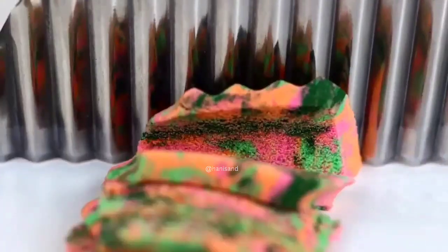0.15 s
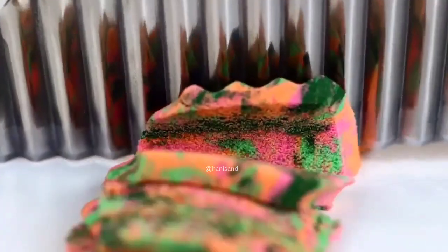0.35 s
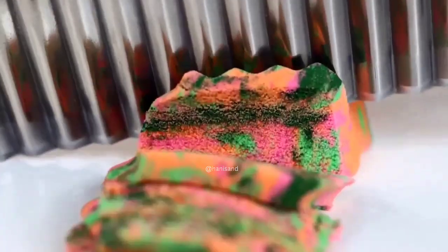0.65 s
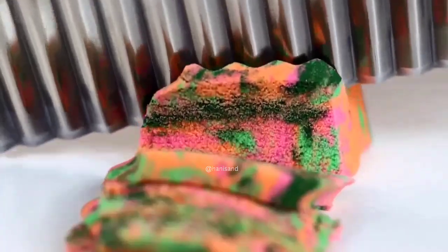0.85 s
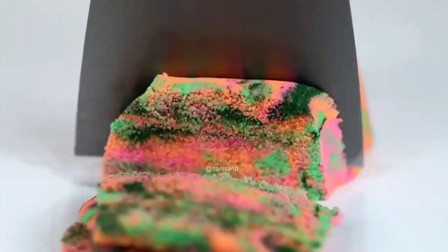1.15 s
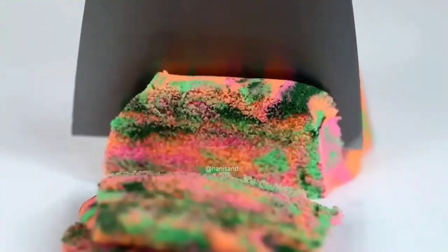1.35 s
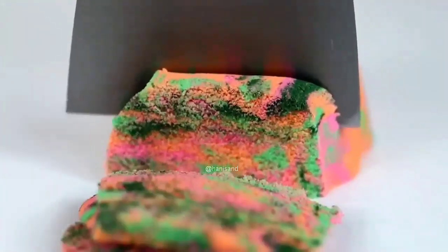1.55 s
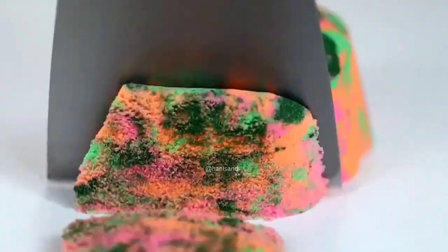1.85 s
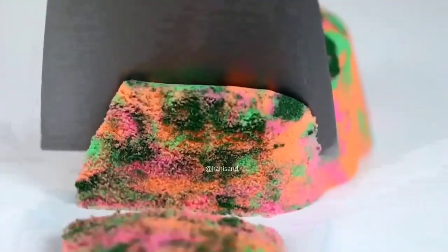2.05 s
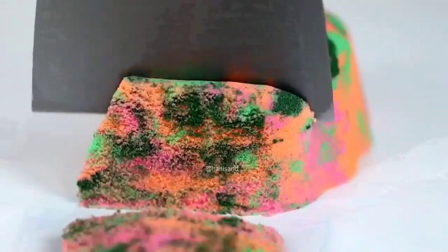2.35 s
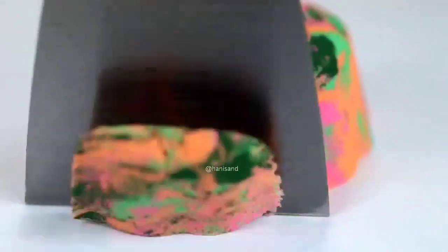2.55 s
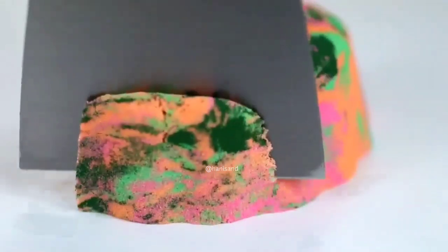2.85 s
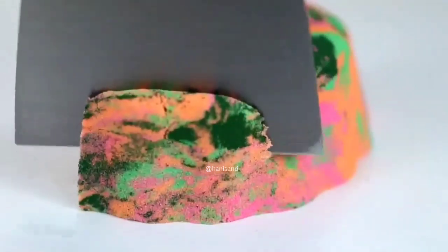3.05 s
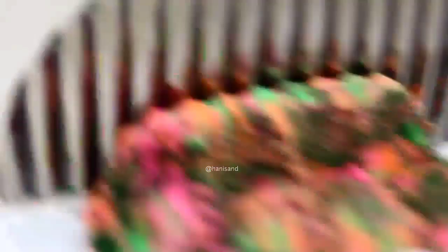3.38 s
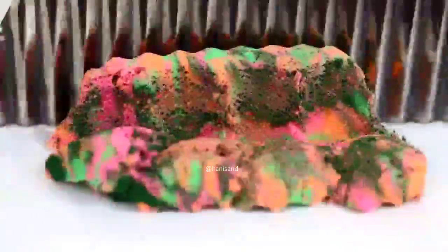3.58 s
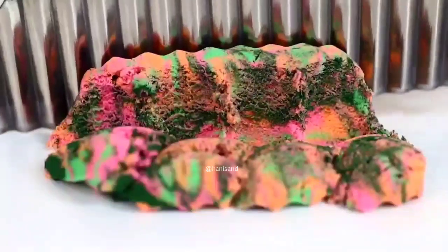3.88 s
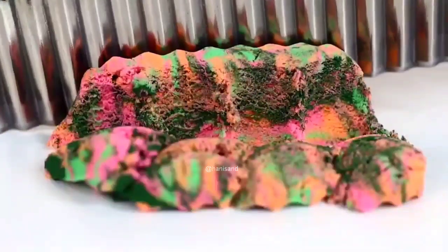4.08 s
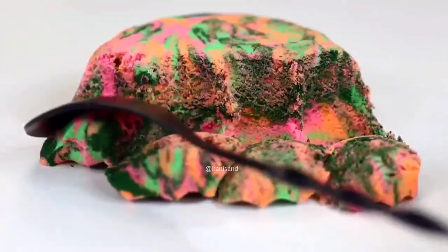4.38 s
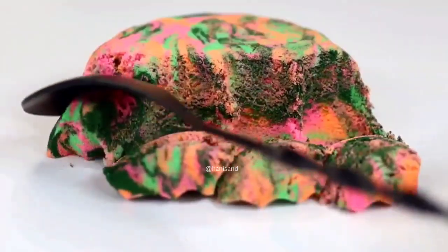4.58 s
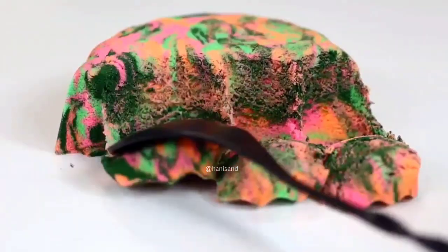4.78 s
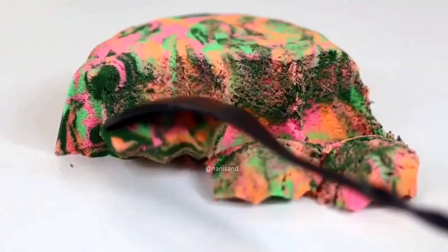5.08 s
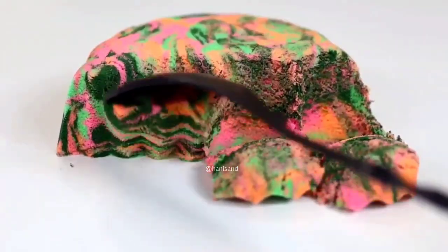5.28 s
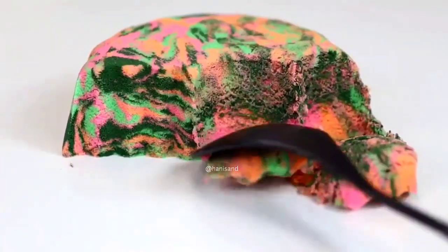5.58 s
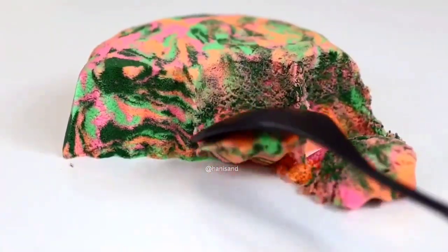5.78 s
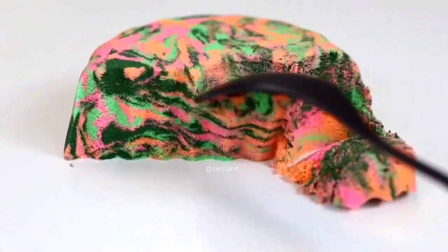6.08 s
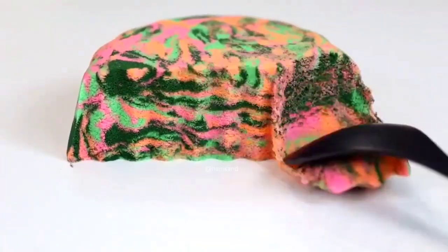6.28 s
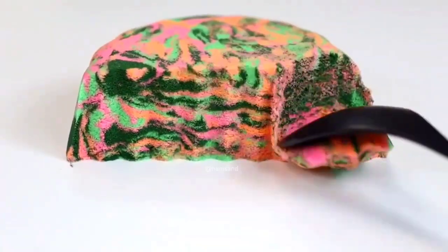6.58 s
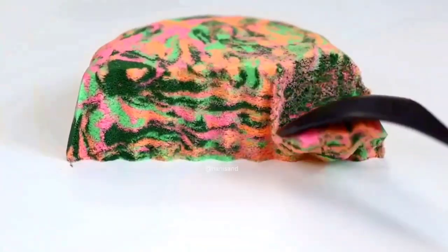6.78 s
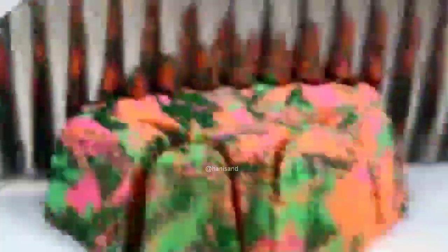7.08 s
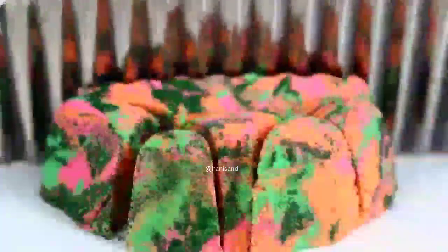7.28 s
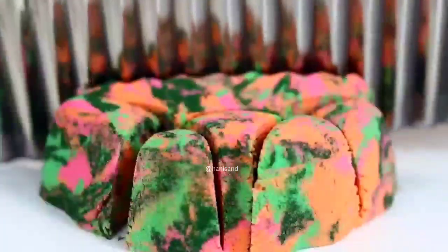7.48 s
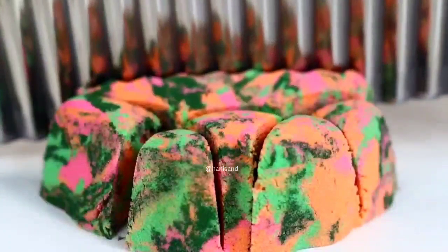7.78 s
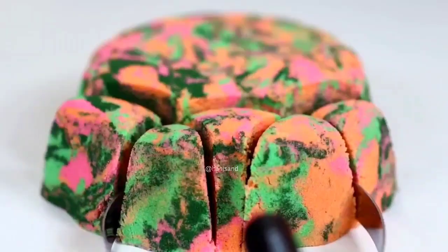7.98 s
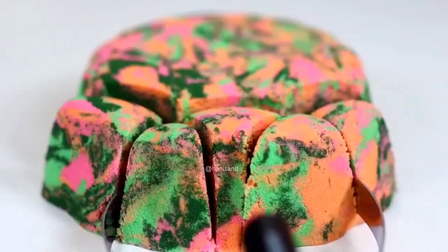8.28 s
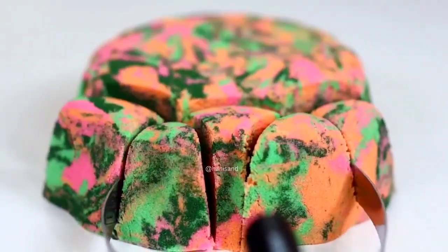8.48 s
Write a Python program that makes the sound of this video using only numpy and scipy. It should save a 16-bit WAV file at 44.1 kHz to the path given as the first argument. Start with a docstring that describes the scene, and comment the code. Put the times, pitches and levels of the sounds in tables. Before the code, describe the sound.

Very close stereo of packed damp sand being cut, played backwards. A wavy blade snaps and rasps, then a flat knife crunches in short strokes. A deep plunge crackles loudly, spoon scoops click and hiss more softly, another heavy plunge crunches, and a small ring scoop ends it. Snaps swell and cut off dead; a faint low rumble lies underneath in a quiet room.

```python
"""Packed damp sand is cut and scooped close to two microphones in a quiet, low-rumbling room, running backwards.
A wavy blade opens at the left, then a flat knife; at the right a blade sunk deep gives way to the wavy blade.
A spoon follows, then the sunk and wavy blades again, and a ring scoop ends it, all in short spliced pieces.
Every snap swells and stops dead, and the crunch of its cut follows it.
Random grain slips and single cracks excite resonances of sand and tool, whose rings precede the blows."""
import sys
import numpy as np
from scipy import signal
from scipy.fft import rfft, irfft, next_fast_len
from scipy.io import wavfile

SR = 44100
rng = np.random.default_rng(int(sys.argv[2]) if len(sys.argv) > 2 else 0)


def gain_from_decibels(decibels):
    """Convert decibel values to linear amplitude factors."""
    exponent = np.asarray(decibels, float) / 20
    return 10 ** exponent


def to_wav(s):
    """Save 16-bit WAV."""
    ch = np.atleast_2d(s).T  # columns
    pcm = np.round(np.clip(ch, -1, 1) * 32767)  # PCM
    wavfile.write(sys.argv[1], SR, pcm.astype(np.int16))


N = 381024


def rms_one(x):
    """Power normalisation: scales to a mean square of one."""
    return x / np.sqrt(np.mean(np.abs(x) ** 2) + 1e-20)


def flutter(rate):
    """Band-limited fluctuation: joins normal random values of spread 1, rate of them a second, by lines."""
    steps = rng.standard_normal(4000)
    return np.interp(np.arange(N) * rate / SR, np.arange(4000), steps)


def band_log(hz, table, column):
    """Spectral interpolation: dB read from a table on a logarithmic frequency axis."""
    table = np.array(table)
    return np.interp(np.log(hz), np.log(table[:, 0]), table[:, column])


# The spliced pieces. Each row: start in seconds, tool, place of the block, thrum of the block in Hz,
# mean level of the room rumble in dB.
PIECES = [(0, "wavy blade", "left", 377, -60.5), (1.075, "flat knife", "near left", 317, -65.5),
          (1.795, "flat knife", "near left", 267, -63.5), (2.501, "flat knife", "near left", 310, -62),
          (3.3557, "sunk blade", "right", 313, -54), (3.616, "wavy blade", "right", 364, -59),
          (4.324, "spoon", "low", 412, -59), (5.58, "spoon", "low", 405, -66),
          (5.704, "spoon", "low", 404, -63.5), (7.0103, "sunk blade", "right", 358, -57),
          (7.22, "wavy blade", "right", 355, -57), (8.036, "ring scoop", "front", 296, -56.5),
          (8.27, "ring scoop", "front", 296, -59)]


def piece_at(t):
    """Piecewise stationarity: the number of the spliced piece that holds at times t."""
    starts = [row[0] for row in PIECES]
    return np.maximum(np.searchsorted(starts, t, "right") - 1, 0)


def room():
    """Low-frequency ambient noise: a wavering rumble, coherent enough to be nearly alike in both channels."""
    band = signal.butter(3, [28, 82], "band", fs=SR, output="sos")
    # a second of run-in is dropped
    noise = signal.sosfilt(band, rng.standard_normal((2, N + SR)))[:, SR:]
    low = rms_one(noise[0] + gain_from_decibels(-17) * noise[1] * [[1], [-1]])
    level_db = np.array([row[4] for row in PIECES])[piece_at(np.arange(N) / SR)]
    return gain_from_decibels(level_db + 2.5 * flutter(6)) * low


# Packed sand breaking, or the edge meeting the table. Each row: peak time in seconds, level in dB before the
# shares of crumbling and crack, body in dB re that level, 60 dB swell time in seconds before stretching.
SNAPS = [(0.0612, -26, -18, 0.024), (0.126, -21, -28, 0.036), (0.1357, -17, -33, 0.017),
         (0.147, -19, -17, 0.049), (0.1543, -16, -25, 0.025), (0.168, -6.5, -18, 0.024),
         (0.173, -16, -12, 0.011), (0.189, -21, -33, 0.059), (0.214, -21, -33, 0.015),
         (0.2305, -24, -25, 0.01), (0.249, -7, -8.5, 0.014), (0.3131, -12, -8.5, 0.0059),
         (0.3213, -17, -4.5, 0.052), (0.8828, -21.5, 3, 0.0038), (1.159, -9, -18, 0.0027),
         (1.1669, -11.5, 1, 0.028), (1.825, -28.5, -12, 0.01), (1.8634, -18.5, -8.5, 0.027),
         (1.902, -19, -16, 0.039), (1.9252, -10.5, 6, 0.015), (2.5378, -15, -12, 0.028),
         (2.589, -25, -17.5, 0.032), (2.646, -20, -28, 0.015), (2.683, -10, -9.5, 0.014),
         (2.7, -24, -20, 0.0065), (2.7631, -9.5, 2, 0.0068), (3.367, -17, -15, 0.0069),
         (3.401, -15, -23, 0.0089), (3.5951, -24.5, -3.5, 0.022), (3.663, -29, -7, 0.063),
         (3.7299, -13, -5, 0.037), (3.7508, -9, -25, 0.05), (3.761, -11, -28, 0.052),
         (3.769, -18, -25, 0.008), (3.776, -21, -17, 0.0072), (3.7802, -15, -35, 0.015),
         (3.794, -16.5, -18, 0.015), (3.8064, -20.5, -27, 0.014), (3.8234, -15.5, -23, 0.0043),
         (3.8315, -18, -22, 0.045), (3.836, -10.5, -23, 0.006), (4.235, -34.5, 7.5, 0.0061),
         (4.3972, -14.5, -18, 0.009), (4.407, -18, -11, 0.0044), (4.4203, -5.5, -18, 0.0023),
         (4.9144, -24, -12, 0.0054), (4.9478, -4, -22, 0.0035), (4.9607, -2.5, -16.5, 0.011),
         (5.63, -22, -22, 0.0075), (5.6463, -25, -24, 0.032), (5.6607, -8, -24, 0.0034),
         (5.68, -0.5, -16.5, 0.0038), (5.6903, -6.5, -20, 0.0079), (6.438, -8.5, -24.5, 0.013),
         (6.445, -1, -48, 0.0061), (6.4565, -9, -33, 0.0037), (6.4635, -5.5, -10.5, 0.036),
         (7.2977, -15, -41, 0.011), (7.3136, -12.5, -43, 0.031), (7.3285, -11.5, -7.5, 0.041),
         (7.3714, -10.5, -69, 0.035), (7.39, -10.5, -12.5, 0.026), (7.3972, -17, -27, 0.0091),
         (7.7076, -29.5, 7, 0.026), (8.081, -21, -17, 0.005), (8.099, -37, -25, 0.004),
         (8.105, -34, -30, 0.0053), (8.1275, -32, -33, 0.0064), (8.142, -35, -16, 0.0056),
         (8.178, -36, -19, 0.0077), (8.19, -26, -23, 0.011), (8.207, -35, -13, 0.004),
         (8.227, -13.5, -26, 0.0044), (8.234, -24, -32, 0.0089), (8.3185, -25, -30, 0.0089),
         (8.3324, -8.5, -22.5, 0.0043), (8.342, -18, -30, 0.013), (8.3599, -13.5, -16.5, 0.014),
         (8.585, -46.5, 15, 0.0091)]
DROP_T60_S = 0.0086   # how fast a snap dies after its peak


def snaps(levels_db, stretch):
    """Brittle fracture: one impulse per snap, and the envelope of crumbling that swells to it and drops fast."""
    cracks, swell = np.zeros(N), np.zeros(N)
    lead_s = np.arange(-400, 2000)[::-1] / SR   # time left until the peak
    for (s, *_, t60), db in zip(SNAPS, levels_db):
        at = round(s * SR)
        cracks[at] = gain_from_decibels(db)
        fall_db = 60 * np.maximum(lead_s / (stretch * t60), -lead_s / DROP_T60_S)
        swell[at - 2000:at + 400] += gain_from_decibels(db - fall_db)
    return cracks, swell


def table():
    """Impact response of a plate: snaps shake the table into dull thumps, time-reversed to swell up to each."""
    thump_db = -32.5   # re the body of the snap
    cracks, _ = snaps([db + body + thump_db for _, db, body, _ in SNAPS], 1)
    band = signal.butter(2, (26.4, 71.5), "band", fs=SR, output="sos")
    top = np.abs(signal.sosfilt(band, signal.unit_impulse(SR // 4))).max()
    return signal.sosfilt(band, cracks[::-1] + 1e-18)[::-1] / top


def grains(per_s, spread_db):
    """Stick-slip friction as a random pulse train: dense slips of uneven size and either sign."""
    sizes_db = spread_db * np.minimum(rng.exponential(1, N), 5)
    sizes = gain_from_decibels(sizes_db) * rng.choice([-1, 1], N)
    return rms_one(sizes * (rng.random(N) < per_s / SR))


def in_time(t, rows):
    """Envelope interpolation: a level curve in dB that is silent outside its ends."""
    return np.interp(t, *np.transpose(rows), left=-120, right=-120)


# Names of the tools, in the order of every table that goes by tool.
TOOLS = ["wavy blade", "flat knife", "spoon", "ring scoop", "sunk blade"]
# Spectral balance of the contact, by tool. Each row: slide body, slide grit, heap body, heap grit and
# snap grit in dB re crunch, trickle between strokes in dB.
TOUCH = [(-8.5, 0, -8, -1.5, -1, -84), (-10.5, 2.6, -6.5, 0.5, 2, -102), (-9, -2.5, -15.5, -9, -5, -62.5),
         (-8, -2, -10, -3.5, -2.5, -62.5), (8, -15, -4, -3, -3.5, -63)]


def touch(t):
    """Contact mechanics: the columns of TOUCH for the tool in use at times t."""
    by_piece = np.array([TOUCH[TOOLS.index(row[1])] for row in PIECES])
    return by_piece[piece_at(t)].T


# Steady slides of a tool through the sand. Each row: start in seconds, end in seconds,
# crunch level in dB at start, middle and end, before fluctuation.
CUTS = [(0.336, 0.873, -46, -40, -54.5), (0.885, 1.065, -40.5, -41, -41.5), (1.162, 1.79, -58, -43.5, -39),
        (1.963, 2.495, -48, -47, -42.5), (2.797, 3.36, -47.5, -44.5, -43.5),
        (3.833, 4.316, -41, -42, -40.5), (4.454, 4.869, -54.5, -50.5, -53), (4.984, 5.576, -47, -50, -51.5),
        (5.685, 6.334, -45, -47.5, -50), (6.488, 7.015, -43, -51, -48.5), (7.429, 7.696, -43, -46.5, -44.5),
        (7.714, 8.029, -40.5, -43.5, -41.5), (8.366, 8.65, -51, -53, -47.5)]
# Sand crumbling away. Each row: peak time in seconds, crunch level in dB at the peak, swell in dB per second.
HEAPS = [(0.008, -41, 303), (0.18, -40.5, 168), (0.234, -34, 302), (0.299, -34, 600), (1.16, -48.5, 145),
         (1.919, -23.5, 268), (2.56, -46.5, 118), (2.756, -24.5, 210), (3.761, -25, 439),
         (4.413, -30.5, 794), (4.952, -28, 1000), (6.42, -47.5, 196), (6.452, -23, 697), (7.3, -38, 445),
         (7.38, -23, 329), (8.364, -33, 232)]
# Effort of the blade forced through a whole block, one list per block.
# Each row: time in seconds, crunch level in dB.
PLUNGES = [
    [(3.358, -20.5), (3.39, -30.5), (3.415, -24), (3.437, -33.5), (3.46, -27.5), (3.54, -26.5),
     (3.575, -38), (3.61, -60)],
    [(7.013, -19.5), (7.045, -24), (7.06, -27), (7.11, -21), (7.17, -25.5), (7.195, -30.5), (7.215, -68)],
]
# Weight of the block, one value per plunge: dB added to the body; the second block is the heavier.
PLUNGE_BODY_DB = [-1.5, 0]
DULLING = 0.13   # dB of grit lost per dB that a slide or snap is stronger


def slipping():
    """Incoherent addition: slides, heaps, plunges and trickle sum in power to body, crunch and grit dB."""
    edge_s, plunge_edge_s = 0.0072, 0.0026   # onset times; a slide also stops within the first
    settle_db_per_s, heap_drop_db_per_s = 112, 559
    t = np.arange(0, N, 32) / SR
    slide_body, slide_grit, heap_body, heap_grit, _, trickle_db = touch(t)
    parts = [(trickle_db, slide_body, slide_grit)]
    for a, b, first, middle, last in CUTS:
        curve = [(a - edge_s, first - 20), (a, first), ((a + b) / 2, middle), (b, last), (b + edge_s, last - 20)]
        db = in_time(t, curve)
        parts.append((db, slide_body, slide_grit - DULLING * (db + 49)))
        # loose grains open each slide at its final level, then thin out
        thinning_db = last - settle_db_per_s * np.maximum(t - a, 0)
        settling_db = np.where((t > a - edge_s) & (t < b), thinning_db, -120)
        parts.append((settling_db, slide_body, slide_grit))
    for s, db, swell in HEAPS:
        fall_db = np.maximum(swell * (s - t), heap_drop_db_per_s * (t - s))
        parts.append((db - fall_db, heap_body, heap_grit))
    for rows, weight_db in zip(PLUNGES, PLUNGE_BODY_DB):
        onset = (rows[0][0] - plunge_edge_s, rows[0][1] - 20)
        parts.append((in_time(t, [onset] + rows), heap_body + weight_db, heap_grit))
    power = sum(gain_from_decibels(np.array([db + body, db, db + grit])) ** 2 for db, body, grit in parts)
    return [np.interp(np.arange(N) / SR, t, 10 * np.log10(row)) for row in power]


def drives():
    """Source excitation: per range, the envelopes of rubbing and crumbling grains and the train of cracks."""
    body_db, crunch_db, grit_db = slipping()
    s, peak_db, snap_body_db, _ = np.transpose(SNAPS)
    heavy_dulling = 0.087   # dB of grit lost per dB of body in a snap
    snap_grit_db = touch(s)[4] - DULLING * (peak_db + 27) - heavy_dulling * (snap_body_db + 30.5)
    pressure_db = flutter(30) + 0.31 * flutter(150)   # the cut advances in jerks
    lower_db = crunch_db + pressure_db + 0.94 * flutter(60) + 2.1 * flutter(9)
    upper_db = crunch_db + 0.26 * pressure_db + 4.6 * flutter(66)
    # slip dB, snap dB, stretch of the swell (longest in the body), crumbling and crack in dB re snap
    layers = [(body_db + 3 * flutter(20), peak_db + snap_body_db, 2.2, -9, -3),
              (lower_db, peak_db, 1.2, -8, -2),
              (upper_db, peak_db, 1.2, -8, -8),
              (grit_db + 0.47 * pressure_db, peak_db + snap_grit_db, 1.1, -3, -9)]
    out = []
    for slip_db, snap_db, stretch, crumble_db, crack_db in layers:
        cracks, swell = snaps(snap_db, stretch)
        out.append((gain_from_decibels(slip_db), gain_from_decibels(crumble_db) * swell, gain_from_decibels(crack_db) * cracks))
    return out


# The thrum, whose pitch each piece sets. The row: width in Hz, then dB for each of TOOLS in this order:
# wavy blade, flat knife, spoon, ring scoop, wavy blade sunk deep.
THRUM = (89, -3.5, -0.5, -1.5, -9, -3.5)
# What sand and tool ring with. Each row: centre in Hz, width in Hz, then dB for each tool as in THRUM.
RINGS = [(255, 370, -5.5, -7, -8.5, -9.5, -10), (521, 150, -5.5, -10, -8.5, 0.5, -11.5),
         (870, 3500, -8.5, -14.5, -13, -23, -13.5), (1456, 950, -19.5, -4, -39, 0.5, -1.5),
         (1852, 540, -10.5, -6.5, 1, -1, -20), (2233, 504, -0.5, 2, -3, 3.5, -0.5),
         (3480, 610, -19, -6.5, -21, -6, -5.5), (5800, 650, -12, -17, -15, -17, -40),
         (7570, 1600, -5.5, -15.5, -24, -16.5, -5.5), (9134, 990, -4, -11.5, -20, -9.5, 2),
         (10340, 1130, 0, -12, -21.5, -8.5, 0.5), (11830, 1600, 1, -10, -13.5, -6.5, -0.5),
         (13700, 1330, -2.5, -7.5, -29, -7.5, 1.5), (15400, 1500, -5.5, -10.5, -19.5, -12, -5)]
# A snap excites thrum and lower rings unlike a slide: dB added to the thrum, then to the first of RINGS in order.
BLOW = [-4, 0.5, 3.5, 2.5, 1, 3.5, -0.5, 3]


def resonances(tool, thrum_hz, grip, hz, blow):
    """Modal superposition: steep-flanked resonances added in power, with the minimum phase of a causal ring."""
    rows = [(thrum_hz, *THRUM)] + RINGS
    modes = [(row[0], row[1], row[2 + tool]) for row in rows] + [grip[:3], grip[3:]]
    added_db = np.pad(blow * np.array(BLOW), (0, len(modes) - len(BLOW)))
    power = 0
    for (centre, width, db), more in zip(modes, added_db):
        detuning = (hz ** 2 - centre ** 2) / (hz * width)
        power = power + gain_from_decibels(db + more) ** 2 / (1 + detuning ** 2) ** 2
    # folding the cepstrum turns the magnitude into a minimum-phase response
    cepstrum = irfft(np.log(power + 1e-9) / 2)
    cepstrum[1:len(hz) - 1] *= 2
    cepstrum[len(hz):] = 0
    return np.exp(rfft(cepstrum))


def ranges(hz):
    """Band splitting: body, lower and upper crunch, and grit, each as a band and the part of it that is kept."""
    body_top_hz, edge_foot_hz, grit_foot_hz = 1050, 3076, 4940

    def passed(edges_hz, kind):
        return signal.sosfreqz(signal.butter(3, edges_hz, kind, fs=SR, output="sos"), hz, fs=SR)[1]

    crunch = passed([body_top_hz, grit_foot_hz], "band")
    return [(passed([100, body_top_hz], "band"), 1),
            (crunch, passed(edge_foot_hz, "low")),
            (crunch, passed(edge_foot_hz, "high")),
            (passed(grit_foot_hz, "high"), 1)]


def echoes(size):
    """Comb filtering: direct sound plus quick scattered returns from table, blade and block."""
    delay = np.arange(2000)
    sparse = rng.random(2000) < .05
    returns = rng.standard_normal(2000) * sparse * gain_from_decibels(-17 - 60 * delay / SR / .022)
    returns[:80] = 0   # no return is that early
    return 1 + rfft(returns, size)


# Where the block sits, in the order of the columns of LEAN.
PLACES = ["left", "near left", "right", "low", "front"]
# Each microphone hears each place in its own colour. Each row: frequency in Hz, left re right in dB by PLACES.
LEAN = [(353, 3.5, 2.5, 0, 5, 5), (876, 12.5, 4.5, 1, 6, 3.5), (1740, -6.5, -5.5, 1, -4.5, -8),
        (2100, -1.5, -4.5, -1, -4, 0), (3150, 12, 9.5, 3.5, 4, 9.5), (6200, 1, 5, -1.5, -1.5, -4.5),
        (9400, 8.5, 1.5, -6.5, 1.5, 0), (12500, 9, 4.5, -5, -2, -1.5)]
# Stereo width. Each row: frequency in Hz, side re mid in dB.
WIDTH = [(60, -34), (150, -9), (380, -9), (950, 2.5), (2380, -4), (5980, 4.5), (15000, -1.5)]


def microphones(near, stray, place, hz):
    """Spaced-pair stereophony: phase lag, incoherent side and level difference set left and right spectra."""
    wide = gain_from_decibels(band_log(hz, WIDTH, 1))
    unlike = np.clip(.25 * np.log2(hz / 400.), .35, .95)   # likeness fades towards the treble
    # a quarter-cycle shifted side is a phase lag between left and right
    side = wide * (1j * np.sqrt(1 - unlike) * near + np.sqrt(unlike) * stray)
    lean = gain_from_decibels(band_log(hz, LEAN, 1 + PLACES.index(place)) / 2)
    return [(near + side) * lean, (near - side) / lean]


# Two rings shift with the grip and depth of the tool. Each row, one per piece: rasp centre in Hz, width in Hz,
# level in dB, then edge centre in Hz, width in Hz, level in dB.
GRIP = [(2250, 590, 1, 3840, 850, -6), (2350, 370, 2, 4000, 1530, -10.5), (2380, 220, -3, 4000, 3300, -9.5),
        (2450, 350, -4.5, 4470, 1640, -8.5), (2010, 290, -2.5, 4070, 1060, -2.5),
        (2350, 420, -1.5, 3740, 1900, -6.5), (2300, 400, -0.5, 4480, 2100, -8),
        (1830, 320, 5, 3950, 860, -3), (2180, 310, 3, 4060, 1846, -8.5), (2210, 180, 8, 4590, 720, -1.5),
        (2720, 330, -3, 4200, 2800, -7.5), (2190, 480, 13, 4150, 1700, -4.5), (1490, 1100, 0, 4680, 470, 2)]


def sand():
    """Source-filter principle in reversed time: slips and cracks excite each piece's resonances backwards."""
    slips = [grains(5000, 1.88) for microphone_path in range(2)]   # the second reaches the microphones unlike
    driven, out = drives(), np.zeros((2, N))
    spare = 4096   # room for rings that begin ahead of the piece
    edges = [max(round(row[0] * SR), 0) for row in PIECES] + [N]
    for (_, tool, place, thrum_hz, _), grip, a, b in zip(PIECES, GRIP, edges, edges[1:]):
        size = 2 * next_fast_len((b - a) // 2 + spare)
        hz = np.maximum(np.fft.rfftfreq(size, 1 / SR), 1)
        scatter = echoes(size)
        rubbed, struck = (resonances(TOOLS.index(tool), thrum_hz, grip, hz, blow) * scatter for blow in (0, 1))
        near, stray = 0, 0
        for (rubbing, crumbling, cracks), (band, part) in zip(driven, ranges(hz)):
            # conjugate: the ring precedes its blow
            ring = np.conj(rms_one(rubbed * band))
            knock = np.conj(rms_one(struck * band))
            shape = np.abs(irfft(knock))
            # the ring peaks at the moment of the snap
            knock = knock * np.exp(2j * np.pi * hz * shape.argmax() / SR)
            ring, knock = ring * np.conj(part), knock * np.conj(part)
            breaking = crumbling * slips[0] + cracks / shape.max()
            near = near + ring * rfft((rubbing * slips[0])[a:b], size) + knock * rfft(breaking[a:b], size)
            stray = stray + ring * rfft((rubbing * slips[1])[a:b], size)
            stray = stray + knock * rfft((crumbling * slips[1])[a:b], size)
        # the splice cuts off what rang before the piece
        out[:, a:b] = irfft(microphones(near, stray, place, hz))[:, :b - a]
    return out


def scene():
    """Superposition: sand between the microphones, over the table and the room."""
    return sand() + table() + room()


def band_limit(x):
    """A steep low-pass at the top of the band."""
    return signal.sosfilt(signal.butter(12, 16680, fs=SR, output="sos"), x)


def record(dry):
    """Amplitude and band limiting: full scale clips, and a steep low-pass cuts the top."""
    low_pass = signal.cheby2(20, 60, 16000, fs=SR, output="sos")   # 60 dB down from 16 kHz
    mix = signal.sosfilt(low_pass, np.clip(dry, -1, 1))
    return band_limit(mix)


dry = scene()
out = record(dry)
to_wav(out)
```